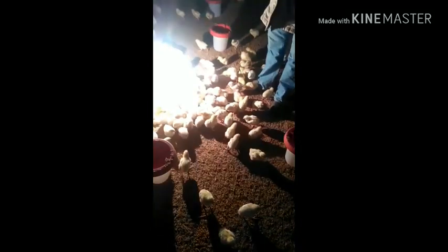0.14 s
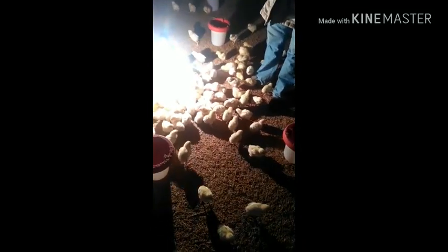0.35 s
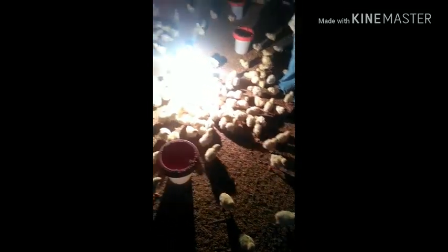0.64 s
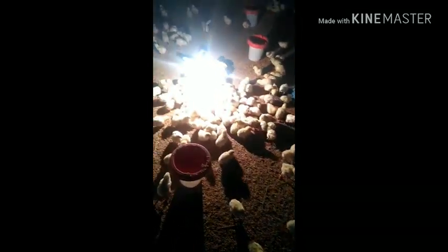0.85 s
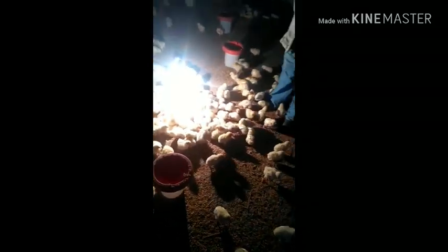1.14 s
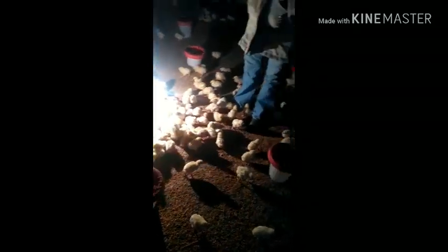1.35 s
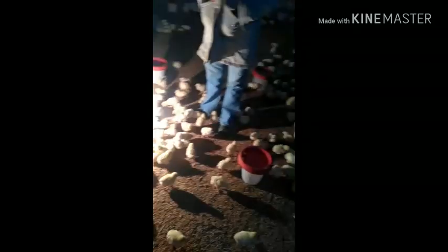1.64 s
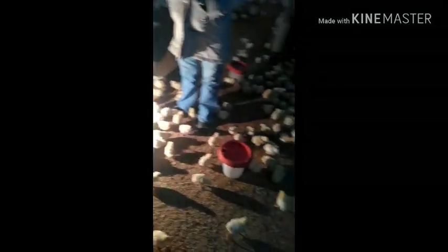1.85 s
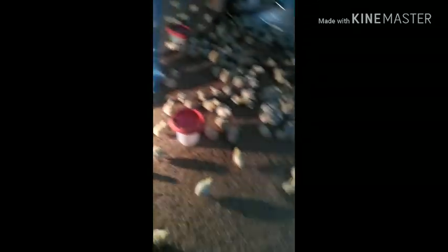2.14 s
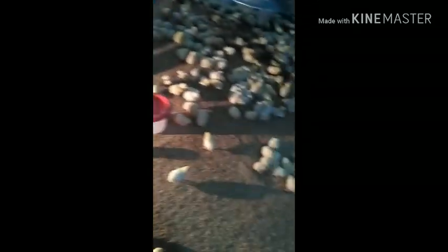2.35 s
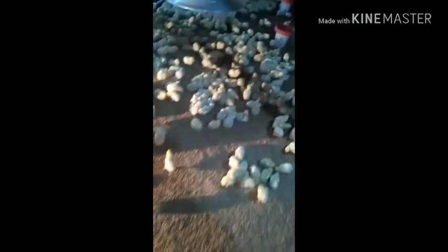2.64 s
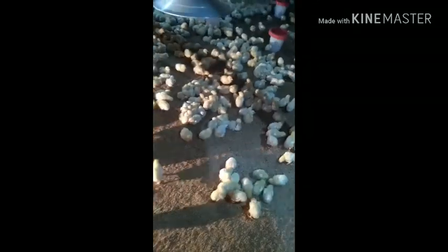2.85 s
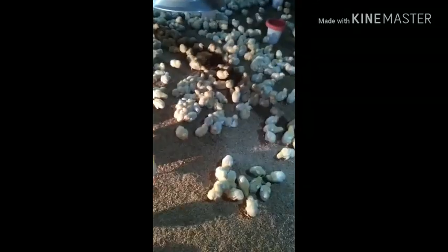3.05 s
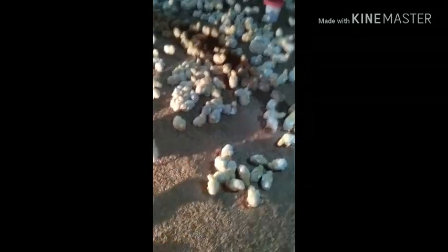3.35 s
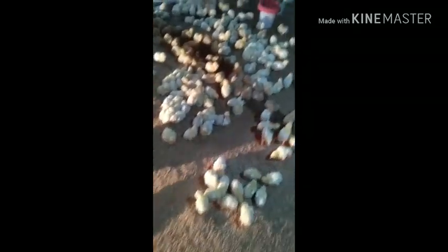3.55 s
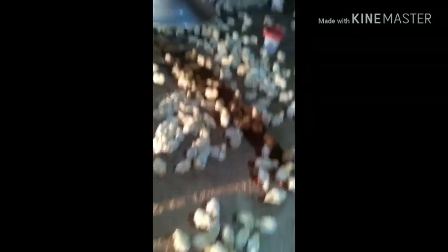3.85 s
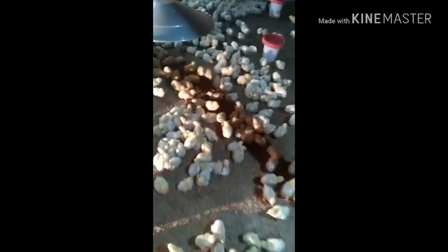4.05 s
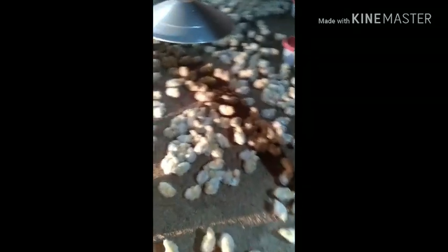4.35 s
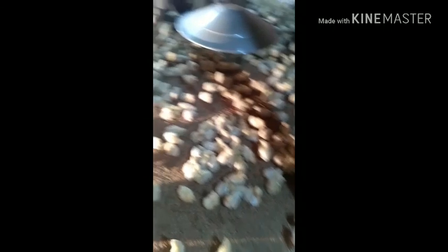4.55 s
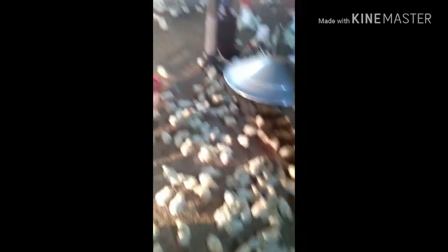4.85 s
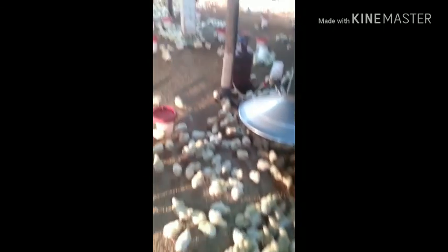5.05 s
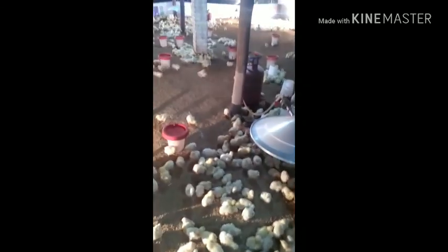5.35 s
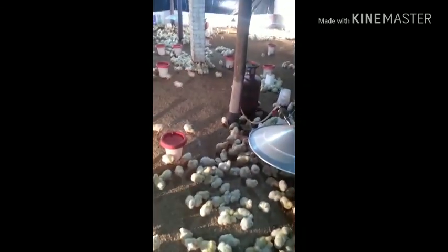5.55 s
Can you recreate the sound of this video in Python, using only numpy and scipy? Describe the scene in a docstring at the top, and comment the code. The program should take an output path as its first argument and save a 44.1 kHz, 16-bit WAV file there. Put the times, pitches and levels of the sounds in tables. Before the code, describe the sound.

A big flock of chicks peeps nonstop in a shed, thinning briefly with soft floor bumps, then growing thicker and louder.

```python
"""Many young chicks peep in a poultry shed, from the first moment to the end; near birds stand out of a chorus.
Each peep is a short whistle with weak overtones, usually falling; random echoes blur it.
Rough, grainy sweeps and thin, hissy high bands, made of a very shaky tone, join in now and then.
The chorus thins out early on, while soft bumps (damped noise) sound on the littered floor.
Later the near peeps come thicker and louder, with more bumps, dry ticks and short swells of the chorus.
A faint rumble of air, rustling litter and microphone hiss, all made of shaped noise, run throughout."""
import sys
import numpy as np
from scipy import signal
from scipy.fft import rfft, irfft, next_fast_len
from scipy.io import wavfile
from scipy.ndimage import uniform_filter1d

SR = 44100
rng = np.random.default_rng(int(sys.argv[2]) if len(sys.argv) > 2 else 0)


def log_audio(samples):
    """Write samples as a 16-bit WAV file to the path given in sys.argv[1]."""
    # one column per channel
    frames = np.atleast_2d(samples).T
    # limit to full scale, then quantise
    limited = np.clip(frames, -1, 1)
    pcm = np.round(limited * 32767).astype(np.int16)
    wavfile.write(sys.argv[1], SR, pcm)


N = 251658
TIME = np.arange(N) / SR  # seconds
SHED_T60_S = 0.6  # time for the shed echo to fade by 60 dB
TOP_HZ = 15500  # the phone passes little above this
SWELL_RISE_DB_PER_S, SWELL_FALL_DB_PER_S = 213, 219

# All levels in these tables are relative: each source trims them further.
# near peeps: (time [s], length [s], start pitch [Hz], end pitch [Hz], level [dB], octave overtone level [dB])
NEAR_PEEPS = [(0.01, 0.041, 2760, 2600, -46.5, -59), (0.033, 0.05, 3750, 3600, -49.5, -84),
              (0.069, 0.023, 2660, 2346, -44.5, -57), (0.195, 0.055, 2930, 2517, -60, -56.5),
              (0.275, 0.03, 2487, 2350, -37, -64), (0.325, 0.03, 2500, 2402, -45.5, -62),
              (0.405, 0.064, 3804, 3077, -46, -74), (0.418, 0.041, 2603, 2234, -42, -65),
              (0.458, 0.057, 3200, 2800, -45.5, -65), (0.598, 0.06, 2950, 2460, -52, -79),
              (0.75, 0.018, 2460, 2222, -44.5, -71), (0.784, 0.0066, 2710, 2440, -36.5, -71),
              (0.9, 0.028, 3696, 3144, -44, -83), (1.151, 0.031, 2640, 2253, -46.5, -89),
              (1.204, 0.013, 2820, 2534, -42, -65), (1.286, 0.023, 3750, 3196, -44.5, -77),
              (1.69, 0.019, 3670, 3240, -45.5, -71), (1.907, 0.042, 2954, 2500, -44.5, -71),
              (2.01, 0.027, 2576, 2250, -47.5, -88), (2.186, 0.03, 2646, 2310, -43.5, -93),
              (2.398, 0.031, 2776, 2325, -45.5, -61), (2.428, 0.02, 3020, 2620, -43, -63),
              (2.549, 0.025, 2710, 2267, -39.5, -81), (2.65, 0.017, 3470, 3100, -42, -90),
              (2.685, 0.0296, 2070, 1884, -53.5, -73), (2.725, 0.035, 2690, 2420, -34.5, -68),
              (2.855, 0.037, 3027, 2470, -41, -63), (3.002, 0.044, 2750, 2287, -42, -57),
              (3.017, 0.058, 3740, 3390, -47.5, -71), (3.078, 0.024, 3210, 2880, -35.5, -74),
              (3.086, 0.032, 2540, 2400, -33.5, -73), (3.109, 0.041, 2830, 2560, -44, -62),
              (3.174, 0.0295, 3430, 3150, -53, -71), (3.223, 0.024, 2605, 2280, -36, -80),
              (3.27, 0.018, 2903, 2373, -32.5, -47.5), (3.363, 0.063, 3830, 3240, -48.5, -66),
              (3.406, 0.043, 2900, 2420, -37, -57), (3.442, 0.024, 2522, 2314, -38, -79),
              (3.526, 0.078, 4220, 4110, -60, -76), (3.65, 0.042, 3300, 2710, -37, -75),
              (3.652, 0.03, 2770, 2340, -39, -60), (3.702, 0.038, 2983, 2500, -38, -55.5),
              (3.718, 0.062, 3023, 2714, -47, -54.5), (3.749, 0.09, 3940, 3450, -50.5, -70),
              (3.836, 0.04, 2620, 2166, -44.5, -64), (4.005, 0.051, 4030, 3650, -52, -73),
              (4.044, 0.035, 2934, 2510, -51, -52.5), (4.077, 0.053, 3914, 3640, -48, -75),
              (4.102, 0.022, 2720, 2434, -37, -58), (4.131, 0.038, 2990, 2670, -41, -76),
              (4.211, 0.044, 2810, 2354, -43.5, -62), (4.232, 0.053, 3450, 2730, -45, -69),
              (4.313, 0.026, 2820, 2420, -38, -89), (4.361, 0.024, 3070, 2680, -37.5, -59.5),
              (4.46, 0.037, 3720, 3150, -43.5, -65.5), (4.487, 0.022, 2853, 2390, -38, -75),
              (4.544, 0.052, 2096, 1937, -53.5, -61), (4.598, 0.06, 3880, 3143, -43, -79),
              (4.659, 0.043, 2700, 2250, -42, -86), (4.813, 0.029, 2900, 2298, -38, -57.5),
              (4.864, 0.049, 3450, 2550, -47.5, -65.5), (4.986, 0.047, 3756, 3290, -44.5, -76),
              (5.001, 0.051, 3846, 3564, -41.5, -66.5), (5.079, 0.031, 2636, 2310, -39.5, -66),
              (5.17, 0.012, 2974, 2450, -36, -80), (5.319, 0.036, 2937, 2445, -44.5, -52.5),
              (5.356, 0.039, 2096, 1930, -46.5, -59), (5.378, 0.017, 3870, 3550, -45, -70),
              (5.469, 0.046, 3756, 3100, -39, -83), (5.474, 0.033, 1956, 2120, -44, -70),
              (5.496, 0.009, 3396, 3200, -26.5, -71), (5.519, 0.027, 2690, 2300, -40, -75),
              (5.631, 0.041, 2487, 2327, -41, -70)]
# rough, grainy sweeps and thin, hissy high bands:
# (time [s], length [s], start centre [Hz], end centre [Hz], level [dB])
ROUGH_SWEEPS = [(0.339, 0.077, 5650, 5200, -56), (0.44, 0.077, 8960, 8570, -62),
                (1.687, 0.049, 3090, 2138, -47), (1.771, 0.1, 2200, 1674, -62.5),
                (2.125, 0.065, 3560, 3160, -46.5), (2.236, 0.1, 5540, 4470, -59),
                (2.397, 0.055, 5260, 4990, -55), (2.717, 0.083, 8940, 8460, -60),
                (2.654, 0.11, 3920, 4446, -49.5), (3.272, 0.026, 9000, 8250, -65),
                (3.361, 0.054, 5080, 4620, -51), (3.407, 0.04, 7060, 6400, -56.5),
                (3.549, 0.044, 6930, 6200, -61), (4.06, 0.062, 6900, 6260, -59.5),
                (4.193, 0.07, 6920, 6500, -59), (5.317, 0.027, 1990, 1820, -50),
                (5.319, 0.045, 3760, 3310, -59)]
# level of the whole chorus: (time [s], level [dB])
CHORUS_LEVEL = [(0.0, -47), (0.54, -52), (0.81, -54.5), (1.25, -51), (1.48, -58.5), (1.73, -57),
                (1.87, -51.5), (2.28, -49.5), (3.16, -46.5), (3.3, -43.5), (3.45, -53), (4.06, -46),
                (4.25, -47), (4.86, -50), (5.29, -49), (5.7, -49.5)]
# short swells of the chorus, many around loud near peeps:
# (time of the peak [s], level [dB], share of shrill voices [0-1])
SWELLS = [(.05, -43, 0.13), (.45, -42, 0.36), (0.618, -40.5, 0.01), (1.2, -51.5, 0), (1.59, -53, 1),
          (1.71, -46, 0), (2.682, -43, 0.5), (2.748, -41.5, 0), (2.88, -43.5, 0), (3.1, -38.5, 0.05),
          (3.459, -38.5, 0), (3.666, -37, 0.35), (4.111, -39, 0.11), (4.26, -41.5, 0.5),
          (4.64, -43.5, 0.65), (5.022, -43, 1), (5.51, -36, 0.3)]
# pitch range of the shrill peepers, as a filter: (frequency [Hz], gain [dB])
SHRILL_RANGE = [(2600, -5), (3100, -6.5), (3900, -13), (4250, -9.5), (4600, -20), (5500, -29)]
# colour of the chorus overtones, as a filter: (frequency [Hz], gain [dB])
OVERTONE_COLOUR = [(3900, 3), (4700, -3.5), (5200, 7), (5850, 7.5), (6200, -2), (7400, -12), (7900, -18),
                   (9000, -9), (10500, -13.5)]
# level of the chorus overtones: (time [s], level [dB])
OVERTONE_LEVEL = [(0.0, -65.5), (0.41, -65.5), (0.73, -79.5), (0.93, -64.5), (1.13, -87), (1.3, -66),
                  (2.08, -80.5), (2.44, -63), (2.54, -72), (2.79, -58), (2.89, -69.5), (3.42, -58),
                  (3.51, -64.5), (3.76, -59.5), (3.93, -70), (4.08, -63), (4.7, -72), (5.7, -68)]
# soft steps and bumps on the floor: (time [s], thud peak [dB], thud pitch [Hz], gritty scuff level [dB])
BUMPS = [(.37, -72, 700, -59.5), (0.573, -61.5, 219, -72), (0.884, -82, 700, -58), (.962, -61, 408, -67),
         (1.197, -45.5, 226, -57), (1.283, -49.5, 217, -85), (1.305, -66, 520, -61.5),
         (1.475, -59, 540, -63.5), (1.543, -51.5, 430, -89), (1.604, -58, 433, -85),
         (1.69, -49.5, 404, -79), (1.94, -75, 740, -58), (2.019, -60.5, 583, -62), (2.15, -65.5, 82.6, -81),
         (3.027, -62, 343, -61.5), (3.072, -56.5, 375, -77), (3.356, -49.5, 600, -57.5),
         (3.509, -49.5, 613, -88), (3.562, -56.5, 785, -83), (3.682, -52, 670, -60), (3.741, -56, 855, -75),
         (3.77, -62.5, 210, -70), (4.481, -57, 720, -82), (5.313, -78, 710, -55), (5.669, -58.5, 190, -68)]
# small dry ticks in the litter: (time [s], level [dB])
LITTER_TICKS = [(0.882, -60), (2.199, -61), (3.42, -53)]
# rustle of the litter: (time [s], level [dB])
RUSTLE_LEVEL = [(0.0, -71), (1.5, -72), (3.7, -68), (5.1, -71), (5.5, -69)]
# colour of the shed's air noise: (frequency [Hz], density [dB per Hz])
AIR_COLOUR = [(25, -22), (50, 8.5), (75, 8.5), (120, 6.5), (220, 8), (400, -12), (650, 2), (1100, -5),
              (1600, -5), (2500, 13), (7000, -5)]
# colour of the microphone hiss: (frequency [Hz], density [dB per Hz])
HISS_COLOUR = [(3000, -21), (7000, -15), (9800, -11.5), (11000, -4), (12200, 1), (13500, -2.5), (15500, -7)]
# loudness of the microphone hiss: (time [s], level [dB])
HISS_LEVEL = [(0.0, -69), (2.49, -69), (3.13, -65), (4.72, -69.5), (5.36, -65), (5.7, -69)]


def near_chicks(third_db=-19, rasp_db=-14, rasp_hz=330, room_db=-11):
    """Close birds; the early echoes of each beat against its glide and break it into a flutter."""
    out = np.zeros(N)
    smooth = signal.butter(4, rasp_hz, fs=SR, output="sos")
    for s, length_s, start_hz, end_hz, db, octave_db in NEAR_PEEPS:
        phase, envelope = peep(length_s, start_hz, end_hz, bend=1.7)
        # turbulence in the throat spreads a rasp around the whistle
        turbulence = unit(signal.sosfilt(smooth, rng.standard_normal(SR // 5)))[:len(phase)]
        source = envelope * (1 + undb(rasp_db) * turbulence)
        whistle = undb(db) * source * np.sin(phase)
        harmonics = np.sin(2 * phase) + undb(third_db) * np.sin(3 * phase)
        overtones = undb(octave_db) * source * harmonics
        add(out, s, .62 * whistle + .68 * overtones)
        add(out, s + .002, .85 * scatter(whistle + .85 * overtones, .014))
    return out + undb(room_db) * shed(out)


def peep(length_s, start_hz, end_hz, bend, unsteady=.018, jitter_hz=700, edge_s=0.0029):
    """One whistle of the syrinx (voice organ): phase and envelope; a bend above 1 glides fastest at first."""
    t = np.arange(int((length_s + edge_s) * SR)) / SR
    hz = end_hz + (start_hz - end_hz) * (1 - t / t[-1]) ** bend
    quaver = np.interp(t * jitter_hz, np.arange(512), rng.standard_normal(512))
    phase = 2 * np.pi * np.cumsum(hz * (1 + unsteady * quaver)) / SR
    # fade in and out smoothly over edge_s
    edge = np.clip(np.minimum(t, t[-1] - t) / edge_s, 0, 1)
    return phase, np.sin(np.pi / 2 * edge) ** 2


def scatter(x, fade_s):
    """A bird's own cluster of echoes from floor, feeders and brooder hoods, with the energy of x."""
    t = TIME[:SR // 16]
    echoes = signal.fftconvolve(x, rng.standard_normal(len(t)) * np.exp(-t / fade_s))
    return echoes * np.linalg.norm(x) / np.linalg.norm(echoes)


def rough_sweeps(unsteady=0.082, room_db=-10):
    """Rough sweeps and hissy high bands: the pitch jumps so fast that the tone breaks into a grainy band."""
    out = np.zeros(N)
    for s, length_s, start_hz, end_hz, db in ROUGH_SWEEPS:
        phase, envelope = peep(length_s, start_hz, end_hz, bend=1, unsteady=unsteady, jitter_hz=end_hz / 3)
        add(out, s, undb(db) * scatter(envelope * np.sin(phase), .012))
    return out + undb(room_db) * shed(out)


def flock(calm_db=-2, shrill_db=-2, overtone_db=1.0):
    """The chorus: calm low peeps, and shrill ones above them, each held even and then given its level."""
    calm_gain, shrill_gain = chorus_gains()
    calm, calm_over = crowd(end_hz=2243, spread=.17, fall=.17, length_s=0.028, loudness_db=3.5, count=480)
    shrill, shrill_over = crowd(end_hz=2947, spread=.17, fall=.16, length_s=.036, loudness_db=5.0, count=520)
    low = undb(calm_db) * steady(calm, 0.047)
    high = undb(shrill_db) * steady(colour(shrill, SHRILL_RANGE), 0.018)
    overtones = colour(unit(calm_over) + 0.97 * unit(shrill_over), OVERTONE_COLOUR)
    overtone_gain = undb(over_time(OVERTONE_LEVEL) + overtone_db)
    return low * calm_gain + high * shrill_gain + steady(overtones, 0.08) * overtone_gain


def crowd(end_hz, spread, fall, length_s, loudness_db, count):
    """Many peeps at random, each with its own echoes: returns fundamentals and overtones."""
    tones, overtones = np.zeros(N), np.zeros(N)
    traits = rng.standard_normal((count, 7))
    for k, (when, pitch, drop, long, loud, hook, facing) in enumerate(traits):
        low_hz = end_hz * (1 + spread * abs(pitch) - 0.02496 * hook)
        high_hz = low_hz * (1 + fall * (1 + .9 * np.tanh(drop)))
        bend = 1.1 * np.exp(.5 * hook)
        phase, envelope = peep(length_s * np.exp(.3 * long), high_hz, low_hz, bend)
        # spread the peeps evenly over the scene, each nudged at random
        s = (k + .6 * when) / count * (N / SR + length_s) - length_s
        envelope = envelope * undb(loudness_db * np.tanh(loud))
        whistle = envelope * np.sin(phase)
        add(tones, s, .75 * whistle)
        add(tones, s + .002, scatter(whistle, .014))
        # overtones beam forward from the beak, so birds facing the phone stand out
        beam = undb(6 * np.tanh(facing - 1))
        add(overtones, s, beam * envelope * (np.sin(2 * phase) + 0.87 * np.sin(3 * phase)))
    blurred = .7 * overtones + .7 * scatter(overtones, .02)[:N] + .65 * shed(overtones)
    return tones + .5 * shed(tones), blurred


def chorus_gains(shrill_under_db=-7):
    """Gains of the calm and the shrill voices: the steady chorus plus short swells that rise and die away."""
    chorus = undb(over_time(CHORUS_LEVEL))
    calm_power = chorus ** 2
    shrill_power = (chorus * undb(shrill_under_db)) ** 2
    for s, db, shrill_share in SWELLS:
        below_peak_db = np.maximum((s - TIME) * SWELL_RISE_DB_PER_S, (TIME - s) * SWELL_FALL_DB_PER_S)
        power = undb(db - below_peak_db) ** 2
        calm_power = calm_power + (1 - shrill_share) * power
        shrill_power = shrill_power + shrill_share * power
    return np.sqrt(calm_power), np.sqrt(shrill_power)


def floor_bumps(ring_cycles=30, width=1.238, scuff_db=1, scuff_rise_s=0.0025, scuff_t60_s=0.14,
                grain_db=3, room_db=-12):
    """Each bump is a damped thud, shorter the higher it sounds, with a grainy scuff of litter."""
    out, t = np.zeros(N), TIME[:SR // 4]
    for s, db, hz, grit_db in BUMPS:
        push, grit = rng.standard_normal((2, len(t)))
        # the push fades by 60 dB in ring_cycles periods of the thud
        push = push * (1 - np.exp(-t * hz)) * undb(-60 * t * hz / ring_cycles)
        thud = band(push, hz / width, hz * width)
        add(out, s, undb(db) * thud / np.abs(thud).max())
        scuff = unit(band(grit * undb(grain_db * walk(160)[:len(t)]), 1020, 1670))
        fade = undb(-60 * t / scuff_t60_s) * (1 - np.exp(-t / scuff_rise_s))
        add(out, s, undb(grit_db + scuff_db) * fade * scuff)
    return out + undb(room_db) * shed(out)


def ticks(tick_db=5, body=0.32):
    """Short bright cracks of dry litter: noise with a very fast fade and a weaker, slower one."""
    out, t = np.zeros(N), TIME[:SR // 10]
    for s, db in LITTER_TICKS:
        fade = np.exp(-t / .0012) + body * np.exp(-t / .008)
        crack = unit(band(rng.standard_normal(len(t)), 1500, 21000, order=1))
        add(out, s, crack * undb(db + tick_db) * fade)
    return out + 0.37 * shed(out)


def background(air_db=-68.5, patter_db=-3, shuffle_db=-6, hiss_db=3.0, crackle_db=-6.5):
    """Wavering air, the patter and fine crackle of many small feet and beaks, and microphone hiss."""
    air = unit(colour(rng.standard_normal(N), AIR_COLOUR)) * undb(air_db + 2 * walk(10.0))
    light_feet = undb(patter_db) * patter(45, 0.015, 1190, 2510)
    shuffle = undb(shuffle_db) * patter(25, 0.028, 265, 844)
    rustle = (light_feet + shuffle) * undb(over_time(RUSTLE_LEVEL))
    # about 45 fine crackles a second, of random strength
    grains = (rng.random(N) < 45 / SR) * undb(3.9 * rng.standard_normal(N))
    crackle = undb(crackle_db) * unit(scatter(grains, 0.00063)[:N])
    treble = unit(colour(rng.standard_normal(N) + crackle, HISS_COLOUR))
    hiss = treble * undb(hiss_db + over_time(HISS_LEVEL) + 1.4 * walk(11.0))
    return air + rustle + hiss


def patter(per_s, fade_s, lo_hz, hi_hz):
    """Random little scrapes in the litter, each a short burst of noise."""
    taps = (rng.random(N) < per_s / SR) * undb(9 * np.tanh(rng.standard_normal(N)))
    # each tap leaves power that dies away exponentially
    power = signal.lfilter([1], [1, -np.exp(-1 / (fade_s * SR))], taps)
    return unit(band(np.sqrt(power) * rng.standard_normal(N), lo_hz, hi_hz))


def shed(x):
    """Diffuse echo of roof, posts and walls: fading noise whose filter has unit energy."""
    t = TIME[:SR // 2]
    tail = rng.standard_normal(len(t)) * undb(-60 * t / SHED_T60_S) * (1 - np.exp(-t / 0.004))
    return signal.fftconvolve(x, tail / np.linalg.norm(tail))[:N]


def undb(db):
    """Decibels to gain."""
    return 10 ** (np.asarray(db) / 20)


def unit(x):
    """Scale to rms (average strength) 1."""
    return x / np.sqrt(np.mean(x ** 2) + 1e-20)


def add(out, s, x):
    """Mix x into out at time s, dropping what falls outside."""
    i = int(s * SR)
    lo, hi = max(i, 0), min(i + len(x), len(out))
    if hi > lo:
        out[lo:hi] += x[lo - i:hi - i]


def over_time(points):
    """Join the (time [s], level [dB]) points by straight lines, one value per sample."""
    return np.interp(TIME, *np.transpose(points))


def colour(x, points):
    """Filter by a (frequency [Hz], gain [dB]) curve, joined by straight lines over log frequency."""
    hz, db = np.transpose(points)
    size = next_fast_len(len(x) + 2048)
    f = np.maximum(np.fft.rfftfreq(size, 1 / SR), 1)
    gain = undb(np.interp(np.log(f), np.log(hz), db))
    return irfft(rfft(x, size) * gain, size)[:len(x)]


def band(x, lo_hz, hi_hz, order=2):
    """Band-pass filter: keeps what lies between two frequencies."""
    edges_hz = [lo_hz, min(hi_hz, .45 * SR)]
    return signal.sosfilt(signal.butter(order, edges_hz, "band", fs=SR, output="sos"), x)


def walk(rate):
    """Random wander with a spread near 1, heading for a new value rate times a second."""
    return np.interp(TIME * rate, np.arange(400), rng.standard_normal(400))


def steady(x, span_s):
    """Hold the rms near 1 over span_s; the small floor keeps gaps from being blown up."""
    local_power = np.abs(uniform_filter1d(x ** 2, int(span_s * SR)))
    return x / np.sqrt(local_power + 0.00071 * np.mean(x ** 2))


def scene():
    """All sources at one microphone."""
    voices = near_chicks() + rough_sweeps() + flock()
    return (voices + floor_bumps() + ticks() + background())[None]


def record(dry):
    """The phone cuts the top with a steep low-pass filter."""
    return signal.sosfilt(signal.ellip(10, .2, 70, TOP_HZ, fs=SR, output="sos"), dry)


dry = scene()
out = record(dry)
log_audio(out)
```